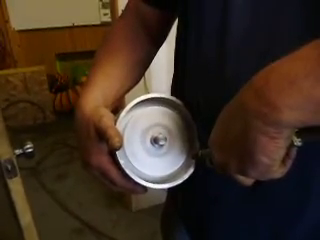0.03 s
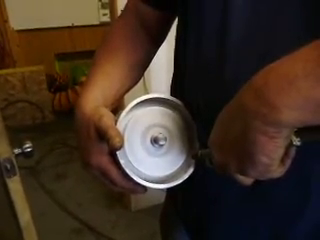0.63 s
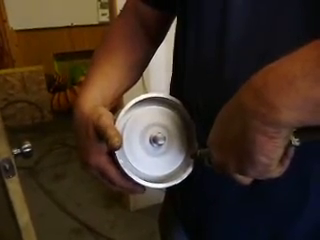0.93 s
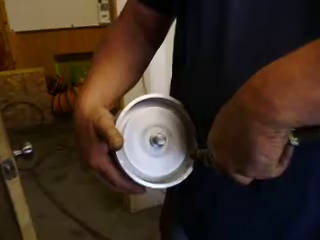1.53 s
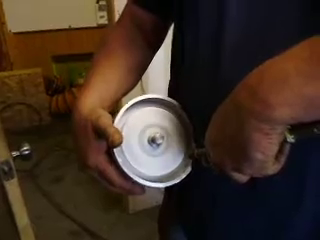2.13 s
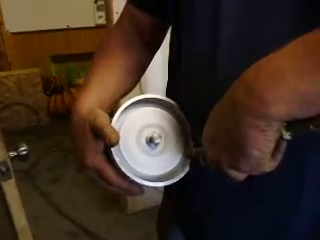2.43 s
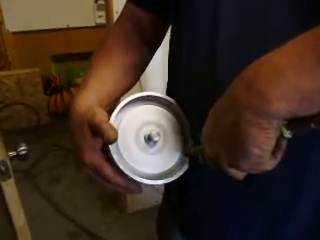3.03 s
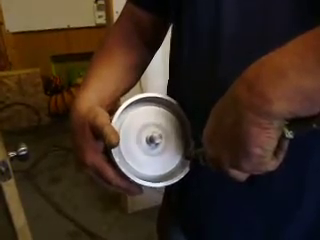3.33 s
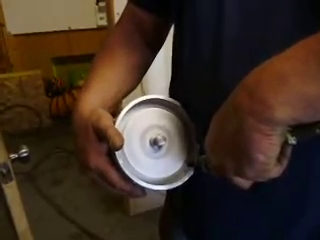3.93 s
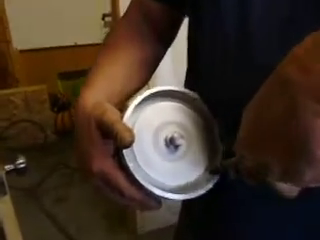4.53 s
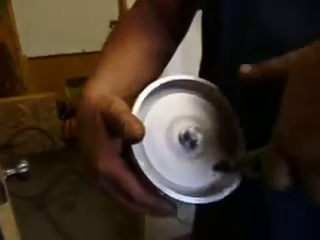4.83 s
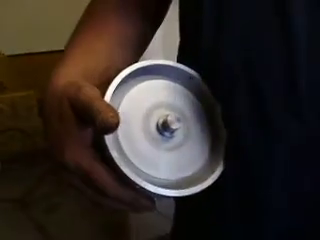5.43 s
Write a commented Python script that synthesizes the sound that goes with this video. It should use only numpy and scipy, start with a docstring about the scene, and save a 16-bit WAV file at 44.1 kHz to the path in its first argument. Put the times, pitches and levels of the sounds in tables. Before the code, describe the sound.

Compressed air hisses through a small spinning metal turbine with a rising whine, then stops abruptly, leaving a faint, quick rattle.

```python
"""Blow gun on a small turbine

A blow gun drives a hand-held metal turbine in a workshop, close to a mono microphone. The jet hisses,
and the blades chop it into a whine that follows the rotor's speed. The air is shut off at once; the room
dies away and the coasting rotor ticks against its housing once a turn, over a faint hum."""
import sys
import numpy as np
from scipy import signal
from scipy.fft import rfft, irfft
from scipy.io import wavfile
from scipy.ndimage import uniform_filter1d

SR = 44100
rng = np.random.default_rng(int(sys.argv[2]) if len(sys.argv) > 2 else 0)


def store_wav(level_fs):
    """Save 16-bit WAV to argv[1]."""
    pcm = np.round(np.clip(np.atleast_2d(level_fs), -1, 1) * 32767)
    wavfile.write(sys.argv[1], SR, pcm.T.astype(np.int16))


N = 250488
TIME = np.arange(N) / SR
AIR_OFF_S = 4.794


def undb(db):
    """Decibels to gain."""
    return 10 ** (np.asarray(db) / 20)


def unit(x):
    """Scale to rms 1."""
    return x / np.sqrt(np.mean(x ** 2))


def curve(table, column=1):
    """One table column, linear in time between rows."""
    rows = np.array(table)
    return np.interp(TIME, rows[:, 0], rows[:, column])


def colour(x, spectrum):
    """Filter by rows of (frequency [Hz], gain [dB])."""
    hz, db = np.transpose(spectrum)
    bins_hz = np.maximum(np.fft.rfftfreq(2 * N, 1 / SR), 1)
    gain = undb(np.interp(np.log(bins_hz), np.log(hz), db))
    return irfft(rfft(x, 2 * N) * gain)[:N]


def butter(x, hz, kind, order):
    """Butterworth filter."""
    return signal.sosfilt(signal.butter(order, hz, kind, fs=SR, output="sos"), x)


def walk(rate_hz):
    """Smooth random drift, rms 1."""
    size = max(int(SR / rate_hz), 1)
    smoothed = uniform_filter1d(rng.standard_normal(N), size, mode="wrap")
    return unit(uniform_filter1d(smoothed, size, mode="wrap"))


def pulses(events, rise_s, decay_s, delay_s):
    """Envelope peaking delay_s after each (time [s], level [dB])."""
    envelope = np.zeros(N)
    for time_s, db in events:
        near = slice(int(time_s * SR) - SR // 50, int(time_s * SR) + SR // 10)
        age_s = TIME[near] - time_s - delay_s
        envelope[near] += undb(db) * np.exp(np.minimum(age_s / rise_s, -age_s / decay_s))
    return envelope


def room(x, wet_db, t60_low_s, t60_high_s, predelay_s=0.0064):
    """Add diffuse workshop echoes; bass and treble decay separately."""
    t = TIME[:SR // 2]
    noise = rng.standard_normal(len(t))
    low = butter(noise, 2200, "low", order=1)
    tail = low * undb(-60 * t / t60_low_s) + (noise - low) * undb(-60 * t / t60_high_s)
    tail *= t > predelay_s
    return x + undb(wet_db) * signal.fftconvolve(x, tail / np.linalg.norm(tail))[:N]


# Hum tones: (frequency [Hz], level [dB])
HUM_TONES = [(73.5, -69), (123.8, -78)]
# Rumble spectrum: (frequency [Hz], relative density [dB])
RUMBLE_SPECTRUM = [(25, 3), (60, -6.5), (100, -10.5), (200, -13), (400, -20), (800, -18), (2000, -43.5),
                   (8000, -69.5)]

def workshop(rumble_db=-68.5, drift_rad=0.4):
    """Low rumble and a hum with drifting phase."""
    hum = sum(undb(db) * np.sin(2 * np.pi * hz * TIME + drift_rad * walk(6)) for hz, db in HUM_TONES)
    rumble = unit(colour(rng.standard_normal(N), RUMBLE_SPECTRUM))
    return np.sqrt(2) * hum + undb(rumble_db) * rumble


def valve_thump(level_db=-49, band_hz=(24, 130)):
    """Soft thump as the valve shuts."""
    thud = unit(butter(rng.standard_normal(N), band_hz, "band", order=2))
    return thud * pulses([(AIR_OFF_S, level_db)], rise_s=0.0077, decay_s=0.02, delay_s=0.00562)


# Shaft pings: (time [s], level [dB])
SHAFT_PINGS = [(5.313, -42), (5.351, -41), (5.429, -54), (5.518, -52), (5.597, -41)]

def shaft(ping_hz=2560, jitter_rad=0.7):
    """The loose shaft gives short, rough pings."""
    envelope = pulses(SHAFT_PINGS, rise_s=0.0014, decay_s=0.0064, delay_s=0.002)
    return envelope * np.sin(2 * np.pi * ping_hz * TIME + jitter_rad * walk(500))


# Housing modes: (frequency [Hz], bandwidth [Hz], gain [dB])
HOUSING_MODES = [(1186, 660, -2), (1560, 330, -10.5), (1710, 56, -9), (2180, 330, -3.5), (3980, 58, 0.5),
                 (4145, 140, -0.5), (4480, 220, -10.5), (5440, 53, 1.5), (6070, 130, 0.5)]

def housing(force):
    """The metal housing rings in its modes."""
    return sum(undb(db) * signal.lfilter(*signal.iirpeak(hz, hz / width_hz, fs=SR), force)
               for hz, width_hz, db in HOUSING_MODES)


def rotor_touches(start_s=4.8802, turn_s=0.03635, slowing_s=0.000305, turns=21):
    """One touch a turn, harder as the rotor slows: (time [s], level [dB])."""
    first_db, limit_db, growth_turns = -49, -38.5, 16.4
    graze_turns, graze_db = (13, 18), -10
    rebound_turns, rebound_db, rebound_s = (14, 19, 20), -4, 0.0093
    touches, time_s = [], start_s
    for turn in range(turns):
        db = limit_db + (first_db - limit_db) * np.exp(-turn / growth_turns)
        touches.append((time_s, db + graze_db * (turn in graze_turns)))
        if turn in rebound_turns:
            touches.append((time_s + rebound_s, db + rebound_db))
        time_s += turn_s + turn * slowing_s
    return touches


# Dry contact spectrum: (frequency [Hz], relative density [dB])
CONTACT_SPECTRUM = [(300, -21), (650, -8.5), (1000, -17.5), (2400, 4), (3200, -4.5), (4200, 11.5),
                    (5200, -1.5), (6300, 0), (7200, -20.5), (8800, -34)]

def rattle(crack_db=18, scuff_db=1.5, bounce_db=-9, rub_db=-59, grit_db=2.5, dry_db=-3, ring_db=-1):
    """The coasting rotor strikes the housing, scuffs and bounces; the bearing rubs throughout."""
    touches = rotor_touches()
    scuff = undb(scuff_db) * pulses(touches, rise_s=0.0006, decay_s=0.0017, delay_s=0.0011)
    bounce = undb(bounce_db) * pulses(touches, rise_s=0.0014, decay_s=0.0034, delay_s=0.007)
    rub_swell = np.interp(TIME, [4.8, 5.68], [0.6, 1.2])
    rub = undb(rub_db + grit_db * walk(250)) * rub_swell
    noise = rng.standard_normal(N)
    force = (scuff + bounce + rub) * noise
    for time_s, db in touches:
        force[int((time_s + 0.0005) * SR)] += undb(db + crack_db)
    contact = colour(force, CONTACT_SPECTRUM) / np.std(colour(noise, CONTACT_SPECTRUM))
    ring = housing(butter(force, 500, "high", order=2)) / np.std(housing(noise))
    # The ticks fall away steeply above about 7 kHz.
    return butter(undb(dry_db) * contact + undb(ring_db) * ring, 6840, "low", order=10)


# Air flow before trim: (time [s], jet level [dB], rush level [dB])
AIR_LEVELS = [(0, -29, -33.5), (.7, -29.5, -34.5), (1.4, -30.5, -35), (1.9, -31, -34.5),
              (2.2, -31.5, -34.5), (2.6, -32.5, -36.5), (3.2, -33, -36.5), (3.55, -31, -35.5),
              (3.9, -30, -32), (4.3, -30, -33.5), (4.62, -28.5, -33), (4.79, -28.5, -33)]
# Air spectrum: (frequency [Hz], relative density [dB])
AIR_SPECTRUM = [(100, -26), (300, -21.5), (330, -16), (365, -24), (520, -12.5), (1200, -4.5), (2250, -5.5),
                (2900, -7.5), (4200, -6), (5050, -2.5), (5650, -7.5), (6600, 0.5), (7350, -1.5),
                (7950, -17.5), (8500, -19.5), (9000, -34)]

def hiss(blade_phase, split_hz=5380, chop=0.066, flicker_db=0.5, ring_db=-9):
    """Bright jet at the nozzle; duller rush through the blades, which rings the housing."""
    jet_trim_db, rush_trim_db = -1.0, 0.5
    jet = unit(butter(colour(rng.standard_normal(N), AIR_SPECTRUM), split_hz, "high", order=8))
    rush = unit(butter(colour(rng.standard_normal(N), AIR_SPECTRUM), split_hz, "low", order=8))
    rush += undb(ring_db) * unit(housing(rush))
    jet *= undb(curve(AIR_LEVELS, 1) + jet_trim_db + flicker_db * walk(60))
    rush *= undb(curve(AIR_LEVELS, 2) + rush_trim_db + flicker_db * walk(48))
    return (jet + rush) * (1 + chop * np.cos(blade_phase))


# Path peaks and notches: (centre [Hz], half width [Hz], gain [dB])
PATH_BANDS = [(440, 16, -11.2), (606, 61, 6.0), (901, 20, -10.7), (959, 39, 1.2), (1022, 12, -10.7),
              (1111, 36, 11.2), (1155, 16, -11.2), (1365, 24, 5.3), (1603, 33, 6.1), (1747, 31, 7.7),
              (1852, 26, -6.9), (2207, 50, 7.6), (2660, 87, 3.1), (4024, 73, 4.6)]

def path_db(hz):
    """Turbine-to-microphone gain; gliding partials swell and dip through it."""
    return sum(db * np.exp(-((hz - centre_hz) / width_hz) ** 2) for centre_hz, width_hz, db in PATH_BANDS)


# Whine partials: (blade rate multiple, base level slow [dB], base level fast [dB])
WHINE_PARTIALS = [(1, -43.5, -26), (2, -32.5, -37.5), (3, -35, -38), (4, -45.5, -35.5), (5, -52.5, -41),
                  (6, -53.5, -33.5), (7, -55.5, -29.5), (8, -56, -38.5), (9, -60.5, -39), (10, -56, -43)]
# Whine swell: (time [s], gain of partials 1-2 [dB], of partial 3 [dB], of upper partials [dB])
WHINE_SWELL = [(0.0, -4.0, -0.5, -6), (0.42, 2, 0.5, 2), (1.71, 1, 2, 0.5), (2.0, 1.5, 3, -0.5),
               (2.2, 7, 7.0, -2.5), (2.28, -3, 2, -2.5), (2.88, 1, 1, -3), (3.14, 4, -2, -0.5),
               (3.24, -2.5, -3.5, 2.0), (3.6, -2, 0, 2), (3.88, 4.5, -5, 7), (4.0, -5.0, -4.5, 0),
               (4.79, -1.5, 0, -6.5)]

def whine(blade_hz, blade_phase, slow_hz=503, fast_hz=652, ring_db=-14):
    """Blades chop the jet. Turbulence shakes the upper partials, which ring the housing."""
    lower_trim_db, lower_flutter_db = -0.27, 0.38
    upper_trim_db, upper_flutter_db, jitter_rad = -0.3, 3.0, 0.2
    speed = np.clip((blade_hz - slow_hz) / (fast_hz - slow_hz), 0, 1)
    lower, upper = 0, 0
    for k, slow_db, fast_db in WHINE_PARTIALS:
        db = slow_db + speed * (fast_db - slow_db) + path_db(k * blade_hz)
        if k <= 3:
            db += curve(WHINE_SWELL, 1 if k <= 2 else 2) + lower_trim_db + lower_flutter_db * walk(44)
            lower += undb(db) * np.sin(k * blade_phase)
        else:
            db += curve(WHINE_SWELL, 3) + upper_trim_db + upper_flutter_db * walk(14)
            upper += undb(db) * np.sin(k * blade_phase + jitter_rad * walk(90))
    return np.sqrt(2) * (lower + upper + undb(ring_db) * housing(upper))


# Rotor speed: (time [s], blade passing rate [Hz])
BLADE_RATE = [(0.0, 408), (0.2, 431.2), (0.55, 465), (0.85, 486.4), (1.2, 501.0), (1.5, 498), (2.2, 526.6),
              (2.35, 540.2), (2.55, 539.5), (2.8, 536), (3.05, 526.3), (3.35, 508.4), (3.65, 496),
              (3.8, 514), (4.2, 587.8), (4.79, 687.5)]

def scene(valve_decay_s=0.004):
    """Hiss and whine until the valve shuts, then ticks; both channels alike."""
    blade_hz = curve(BLADE_RATE)
    blade_phase = 2 * np.pi * np.cumsum(blade_hz) / SR
    valve = np.exp(-np.maximum(TIME - AIR_OFF_S, 0) / valve_decay_s)
    air = room(hiss(blade_phase) * valve, wet_db=-10, t60_low_s=0.32, t60_high_s=0.2)
    tone = room(whine(blade_hz, blade_phase) * valve, wet_db=-11, t60_low_s=0.33, t60_high_s=0.32)
    ticks = room(rattle() + shaft(), wet_db=-12.5, t60_low_s=0.18, t60_high_s=0.44)
    return np.tile(air + tone + ticks + valve_thump() + workshop(), (2, 1))


def record(dry):
    """The microphone cuts the top treble."""
    cutoff_hz = 8900
    return signal.sosfilt(signal.ellip(10, 0.2, 80, cutoff_hz, fs=SR, output="sos"), dry)


dry = scene()
out = record(dry)
store_wav(out)
```